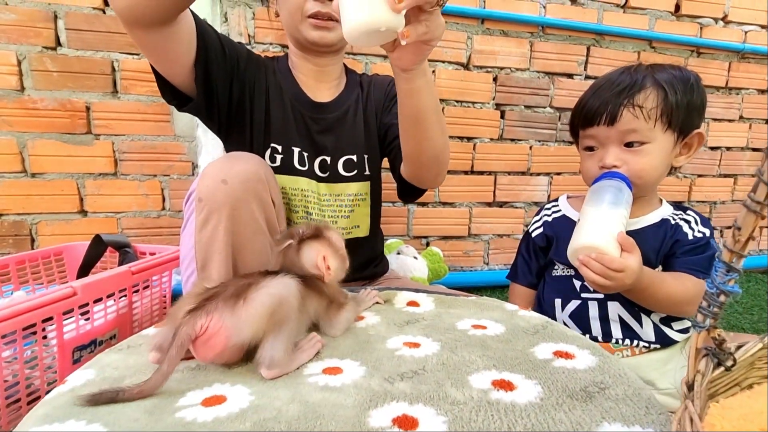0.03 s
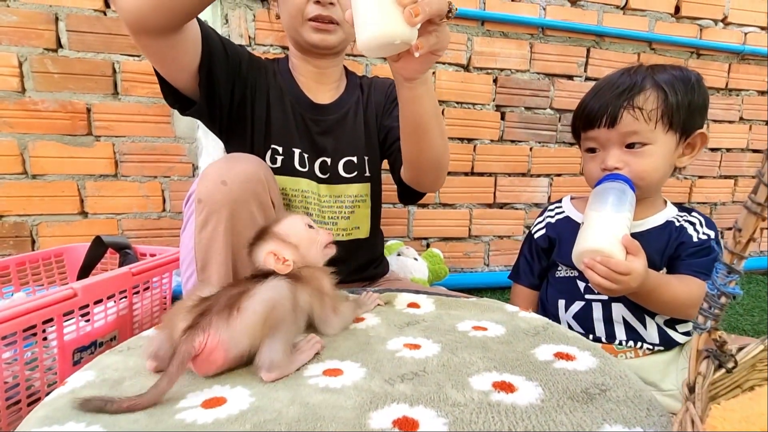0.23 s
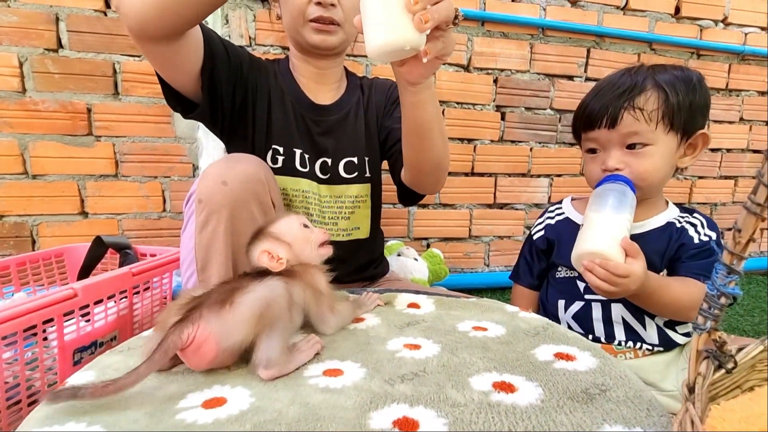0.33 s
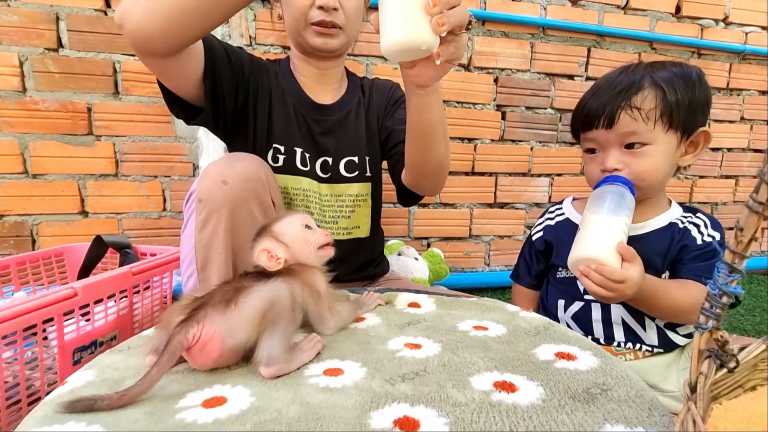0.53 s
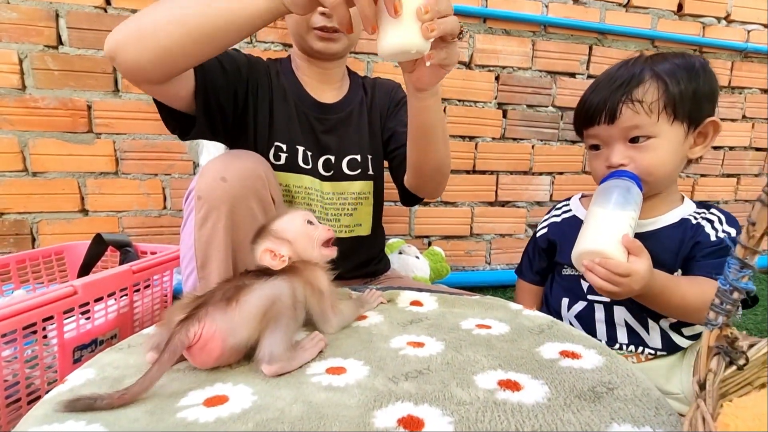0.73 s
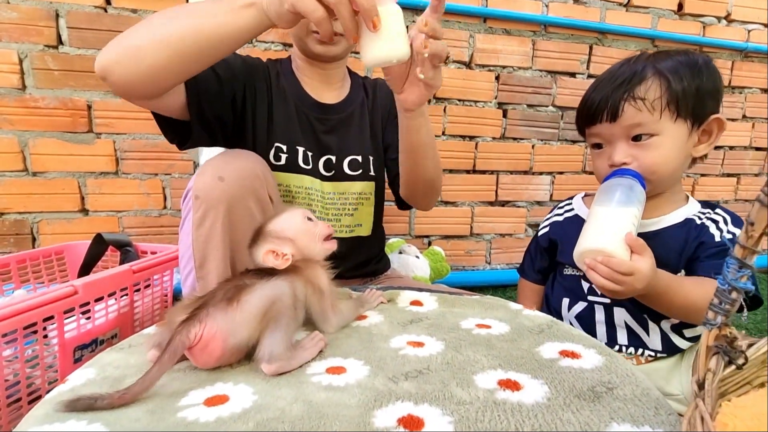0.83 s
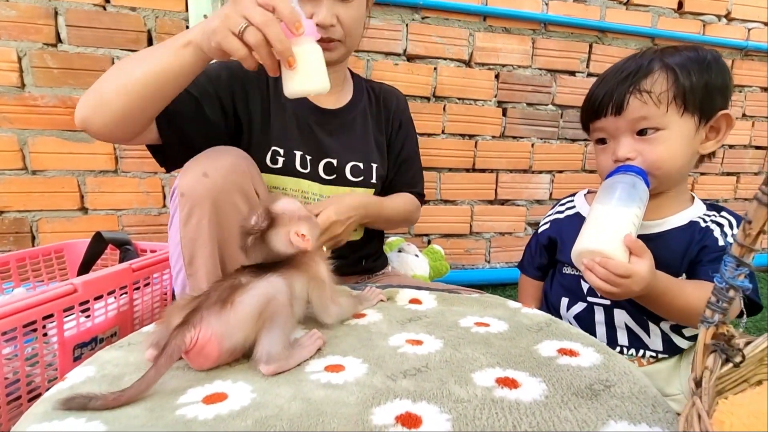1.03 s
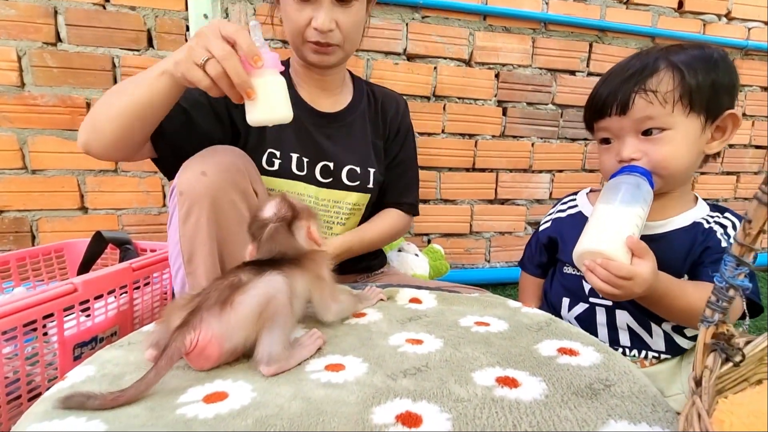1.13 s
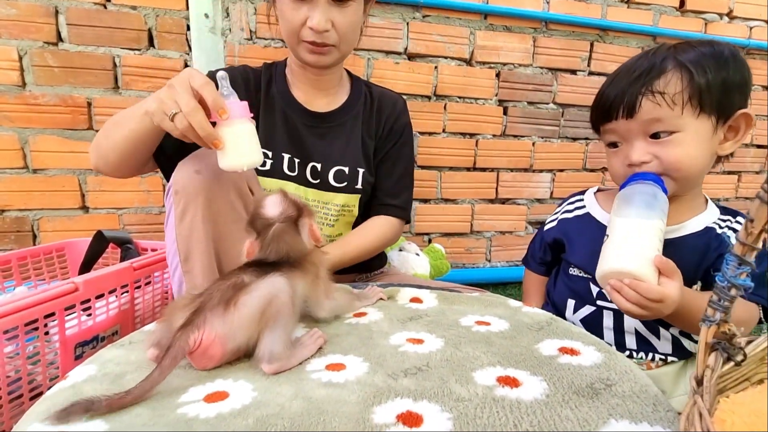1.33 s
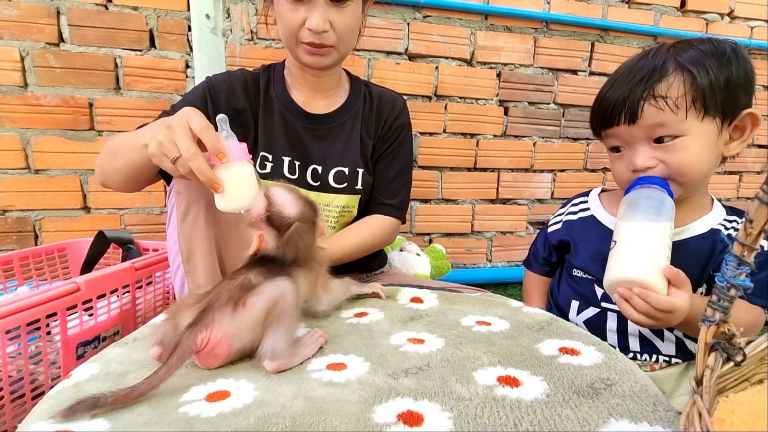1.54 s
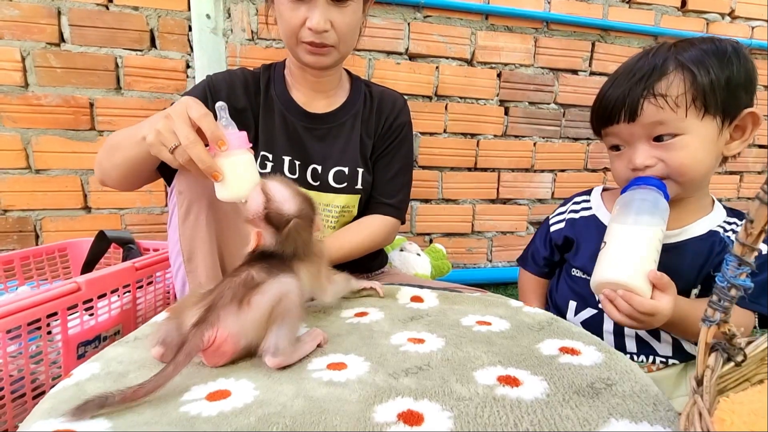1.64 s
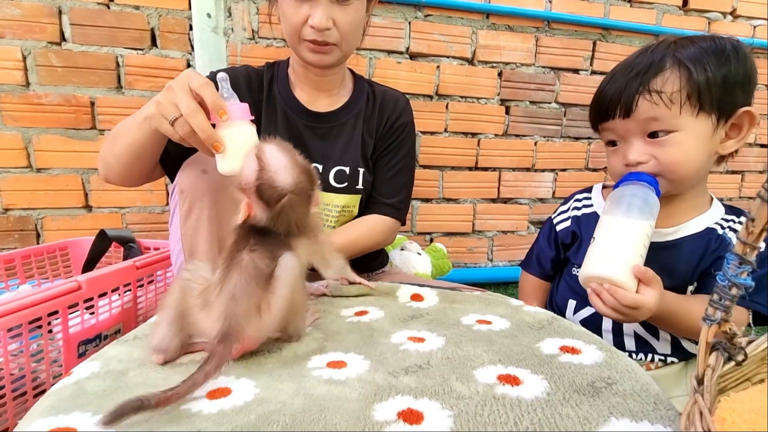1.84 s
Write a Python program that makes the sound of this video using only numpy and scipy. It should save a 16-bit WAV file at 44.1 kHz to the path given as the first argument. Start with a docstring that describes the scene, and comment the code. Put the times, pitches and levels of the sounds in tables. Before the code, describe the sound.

Five brief piercing cries from a hungry infant monkey, loudest at the third and fourth, sink into throaty grumbles with a short coo and final squeak, near the microphone, with hard wall echoes and faint low hum.

```python
"""A hungry baby monkey shrieks five times in a walled yard, each cry rising, then sliding down and roughening.
The last sinks into a grumble and a short coo; a second hoarse grumble ends in a squeak.
Voice: pulse-train folds and gated air noise through a throat filter, then two ports, left one leading.
Yard: discrete near echoes plus decaying noise; an earlier cry's ring is fading noise.
Background: coloured noise for rumble, hiss and blanket rustles; wavering sines for hum."""
import sys
import numpy as np
from scipy import signal
from scipy.fft import rfft, irfft
from scipy.io import wavfile
from scipy.ndimage import uniform_filter1d

SR = 44100
rng = np.random.default_rng(int(sys.argv[2]) if len(sys.argv) > 2 else 0)


def waveform_to_disk(signal):
    """Save audio, clipped to [-1, 1], as 16-bit WAV at the path in sys.argv[1]."""
    frames = np.transpose(np.atleast_2d(signal))
    scaled = np.clip(frames, -1, 1) * 32767
    samples = np.round(scaled).astype(np.int16)
    wavfile.write(sys.argv[1], SR, samples)


N = 83790
T = np.arange(N) / SR
HZ = np.fft.rfftfreq(2 * N, 1 / SR)
EDGE_HZ = 15850  # limit of the voice harmonics and of the recorder


def amp(db):
    """Decibels to gain."""
    return 10 ** (np.asarray(db) / 20)


def unit(x):
    """Scales to rms 1."""
    return x / np.sqrt(np.mean(x ** 2) + 1e-20)


def read(points, hz=HZ):
    """Interpolates a table linearly on a log-frequency axis."""
    f, value = np.transpose(points)
    return np.interp(np.log(hz + 1), np.log(f + 1), value)


def envelope(points):
    """Gain over time from a (time [s], level [dB]) table, linear in dB."""
    return amp(np.interp(T, *np.transpose(points)))


def colour(x, gain):
    """Filters by a gain for each frequency."""
    return irfft(rfft(x, 2 * N) * gain)[..., :N]


def wander(rate_hz):
    """Low-passed noise of rms 1."""
    return unit(colour(rng.standard_normal(N), np.exp(-(HZ / rate_hz) ** 2)))


# ring spectrum, relative: (frequency [Hz], level [dB])
RING_SPECTRUM = [(300, -29), (1100, -4.5), (1700, -16), (2300, -1.5), (3100, 0.5), (4400, -4), (5600, -5.5),
                 (7500, -27), (13000, -41), (16000, -40)]
RING_START_DB, RING_DECAY_DB_PER_S = -40.5, 269  # start level is before the port trim


def dying_ring():
    """The yard still rings from a cry just before: coloured noise decaying exponentially."""
    noise = unit(colour(rng.standard_normal((2, N)), amp(read(RING_SPECTRUM))))
    decay = amp(RING_START_DB - RING_DECAY_DB_PER_S * T)
    port_trim = amp([[-3], [2]])
    return noise * decay * port_trim


# air spectrum, relative density: (frequency [Hz], level [dB per Hz])
AIR_SPECTRUM = [(20, -14), (60, 2.5), (110, -3.5), (160, -11), (260, -16.5), (500, -24.5), (1000, -30.5),
                (2000, -31.5), (4200, -31.5), (7000, -39), (12000, -50.5), (16000, -53)]
# left-right likeness of the air: (frequency [Hz], correlation [-1..1])
AIR_LIKENESS = [(25, 0.37), (90, 0.94), (200, .8), (500, .5), (2000, .2), (10000, .1)]
AIR_DB = -51.5


def air():
    """Low rumble and faint hiss: coloured noise, partly shared by the two ports."""
    left, other = rng.standard_normal((2, N))
    same = np.clip(read(AIR_LIKENESS), -1, 1)
    right = colour(left, same) + colour(other, np.sqrt(1 - same ** 2))
    return amp(AIR_DB) * unit(colour(np.array([left, right]), amp(read(AIR_SPECTRUM))))


# hum lines before drift and overall level: (frequency [Hz], level [dB])
HUM_LINES = [(85.5, -56), (172, -61)]
# overall hum level: (time [s], level [dB])
HUM_LEVEL = [(0, -9), (.45, -2), (.9, 2), (1.5, 3.5), (1.9, 2.5)]
HUM_DRIFT, HUM_DRIFT_HZ = 0.016, 6  # rms fraction, rate
HUM_SWELL, HUM_SWELL_HZ = 0.46, 8


def hum():
    """Wavering hum, as of a distant motor: sines with common frequency drift and separate swells."""
    drift = 1 + HUM_DRIFT * wander(HUM_DRIFT_HZ)
    total = 0
    for hz, db in HUM_LINES:
        sine = np.sin(2 * np.pi * np.cumsum(hz * drift) / SR)
        swell = 1 + HUM_SWELL * wander(HUM_SWELL_HZ)
        total = total + amp(db) * unit(sine * swell)
    return total * envelope(HUM_LEVEL)


# colour of the clear voice, top harmonics weakened: (frequency [Hz], gain [dB])
CLEAR_COLOUR = [(300, 0), (5500, 0), (8500, -6), (11000, -10), (15000, -14)]
# colour of the rasp: (frequency [Hz], gain [dB])
RASP_COLOUR = [(300, -2.5), (900, -6), (1600, 4.5), (3000, 1.5), (6000, 3.5), (9000, 5), (12000, 5)]
JITTER, JITTER_HZ = .075, 306.3  # rms pitch fraction at full roughness, rate
WAVER, WAVER_HZ = 0.0086, 90  # rms pitch fraction at any roughness, rate
SHIMMER, SHIMMER_HZ = 1, 450  # rms amplitude fraction at full roughness, rate
PUFF_GATE = 0.23  # modulation depth of the air by the fold cycle


def folds(turn, mean_pitch_hz):
    """Vocal folds: band-limited pulse train, all harmonics up to the band edge."""
    count = np.floor(EDGE_HZ / mean_pitch_hz)
    pulses = np.sin((count + .5) * turn) / (2 * np.sin(turn / 2) + 1e-12) - .5
    return colour(unit(pulses), amp(read(CLEAR_COLOUR)))


def air_puffs(turn):
    """Rasp: turbulence noise gated once per fold cycle."""
    gated = (1 + PUFF_GATE * np.cos(turn)) * rng.standard_normal(N)
    return colour(unit(gated), amp(read(RASP_COLOUR)))


FIZZ_HZ, MOUTH_WIDTH_HZ = 7410, 275


def vocal_tract(throat, mouth, fizz_db):
    """Throat curve plus mouth resonances and fizz, as a minimum-phase response."""
    shape_db = read(throat) + fizz_db * np.clip(2 * (HZ / FIZZ_HZ - 1), 0, 1)
    for f, db in mouth:
        shape_db = shape_db + db / (1 + ((HZ - f) / MOUTH_WIDTH_HZ) ** 2)
    log_gain = np.log(amp(np.r_[shape_db, shape_db[-2:0:-1]]))
    return np.exp(signal.hilbert(log_gain).conj())[:N + 1]


SPLIT_HZ, SPLIT_SLOPE_HZ = 2050, 80
FADE_IN_S, FADE_OUT_S = 0.0069, .005


def call(curve, mouth, fizz_db, alternation, throat, low_rough):
    """Folds, steady or chaotic, mixed with puffs through the tract; low band less rough than treble."""
    times, *columns = np.transpose(curve)
    pitch_hz, rough, low_db, high_db = (np.interp(T, times, c) for c in columns)
    rough = np.clip(rough, 0, 1)
    hz = pitch_hz * (1 + JITTER * rough * wander(JITTER_HZ) + WAVER * wander(WAVER_HZ))
    turn = 2 * np.pi * np.cumsum(hz) / SR
    clear = folds(turn, pitch_hz.mean())
    # cos(turn / 2) makes alternate pulses strong and weak
    shake = SHIMMER * wander(SHIMMER_HZ) + 2 * alternation * np.cos(turn / 2)
    rasp = air_puffs(turn)
    tract = vocal_tract(throat, mouth, fizz_db)
    below = .5 - .5 * np.tanh((HZ - SPLIT_HZ) / SPLIT_SLOPE_HZ)
    out = 0
    for part, r, db in ((below, rough * low_rough, low_db), (1 - below, rough, high_db)):
        voice = (1 - r) * clear * (1 + r * shake) + r * rasp
        band = colour(voice, tract * part)
        # level each band over about 7 ms, then apply its curve
        local_rms = np.sqrt(abs(uniform_filter1d(band ** 2, size=300)) + 1e-12)
        out = out + amp(db) * band / local_rms
    fade_in = np.clip((T - times[0]) / FADE_IN_S, 0, 1)
    fade_out = np.clip((times[-1] - T) / FADE_OUT_S + 1, 0, 1)
    return out * fade_in * fade_out


# shriek curves, levels before the direct and echo gains:
# (time [s], pitch [Hz], roughness [0-1], level below split [dB], level above split [dB])
SHRIEK_1 = [(0.232, 1154, 0.58, -33.5, -52.5), (0.236, 1223, 0.48, -28, -32.5),
            (0.243, 1233, 0.22, -21.5, -27.5), (0.249, 1189, 0.24, -40.5, -24.5),
            (0.256, 991, 0.48, -32, -28.5), (0.264, 774, 0.65, -30.5, -36), (0.274, 710, 0.83, -41, -44.5),
            (0.288, 593, 1, -59, -45.5)]
SHRIEK_2 = [(0.429, 1107, 0.7, -60, -35), (0.435, 1200, 0.54, -21, -21.5), (0.443, 1251, 0.59, -31, -30.5),
            (0.451, 1113, 0.53, -22.5, -17), (0.46, 1023, 0.29, -33, -36), (0.476, 873, 0.57, -35, -31.5),
            (0.492, 726, 0.5, -53, -47.5)]
SHRIEK_3 = [(0.642, 1493, 0.52, -43, -25.5), (0.649, 1685, 0.14, -13, -13), (0.655, 1448, 0.078, -23, -13),
            (0.664, 1317, 0.52, -32, -13.5), (0.677, 1122, 0.15, -26.5, -14.5),
            (0.682, 1048, 0.3, -32.5, -18.5), (0.688, 1000, 0.46, -28.5, -19.5),
            (0.703, 836, 0.29, -47, -28.5), (0.716, 794, 0.27, -58, -33)]
SHRIEK_4 = [(0.861, 1650, 0.4, -28, -30), (0.865, 1756, 0.2, -30, -15.5), (0.87, 1866, 0.12, -55, -20),
            (0.875, 1857, 0.2, -43, -11.5), (0.881, 1580, 0.08, -17, -10), (0.89, 1457, 0.06, -30.5, -10),
            (0.9, 1391, 0.15, -31, -20), (0.908, 1103, 0.45, -30.5, -18), (0.92, 963, 0.65, -32, -27),
            (0.934, 803, 0.8, -82, -32.5)]
SHRIEK_5 = [(1.095, 850, 0.26, -43.5, -42), (1.105, 1087, 0.08, -34.5, -28), (1.117, 1172, 0.049, -29, -26),
            (1.125, 1114, 0.082, -31, -27), (1.132, 953, 0.21, -39, -22), (1.141, 791, 0.53, -29, -24.5),
            (1.147, 733, 0.6, -38.5, -33), (1.162, 769, 1, -38, -39), (1.178, 710, 0.61, -49, -43.5)]
# shriek settings: (curve, mouth resonances [(frequency [Hz], lift [dB])], fizz [dB], pulse alternation [0-1])
SHRIEKS = [(SHRIEK_1, [(2380, 15.5), (3650, 12.5), (6500, 14)], 11, .1), (SHRIEK_2, [(3300, 6),
           (1210, -4.5), (6100, 3.5)], 5.1, .1), (SHRIEK_3, [(4150, 8), (1934, -11), (6600, 10)], 9, 0.11),
           (SHRIEK_4, [(4370, 6), (2360, -8.5), (6440, -7)], 3.5, 0.072), (SHRIEK_5, [(4460, 9),
           (2980, -16.5), (3430, 14.5)], 8.5, 0.049)]
# throat with the mouth wide open: (frequency [Hz], gain [dB])
OPEN_THROAT = [(150, -44.5), (350, -12), (550, -3.5), (1100, -5), (1700, -3), (2000, -3.5), (2450, -5),
               (2900, -5.5), (3450, -4.5), (4400, 2), (5700, -6.5), (6600, -13), (7400, -19.5),
               (8900, -17.5), (10800, -39), (12800, -22), (15800, -43.5)]


def shriek_calls():
    """Five cries with the mouth wide open, roughness reduced below the split."""
    return sum(call(*row, OPEN_THROAT, low_rough=.56) for row in SHRIEKS)


# port balance: (frequency [Hz], left minus right [dB])
BALANCE_DB = [(200, 18.5), (450, 5.5), (800, 4.5), (1200, 5), (1800, 1.5), (2700, -7.5), (3500, -2.5),
              (4400, -11.5), (5100, -9), (6400, -5.5), (9500, 1), (12700, -5), (15000, -7)]
# phase lead of the left port: (frequency [Hz], lead [rad])
LEAD_RAD = [(50, 10.5), (500, 0.02), (1100, 1.43), (1900, 3.5), (3000, 4.5), (4300, 3), (5000, 4.5),
            (7000, 8.5), (9000, 11), (12500, 14), (16000, 16.5)]


def microphones(x, lag_s):
    """Two ports of different colour, the left leading in phase; lag_s adds lead, in full from 3 kHz."""
    sides = np.array([[.5], [-.5]])
    tilt = amp(read(BALANCE_DB) * sides)
    tilt = tilt / np.sqrt((tilt ** 2).mean(0))
    lead_rad = read(LEAD_RAD) + 2 * np.pi * HZ * lag_s * np.clip(HZ / 3000, 0, 1)
    return colour(x, tilt * np.exp(1j * lead_rad * sides))


# tail decay: (frequency [Hz], t60 [s])
YARD_T60_S = [(200, 0.84), (1000, 0.15), (2400, 0.22), (4500, 0.43), (7000, 0.11), (14000, 0.22)]
# tail spectrum before tail_db and port trim: (frequency [Hz], level [dB])
YARD_DB = [(200, -5.5), (1000, -18), (1900, -20), (2400, -8), (3200, -14.5), (4500, -29), (6000, -12.5),
           (7500, -9.5), (10000, -13.5), (14000, -22)]
# near echoes before scatter and echo_db: (delay [s], gain [dB])
ECHOES = [(.0031, -16), (.0058, -17.5), (.0094, -12.5), (0.013, -34), (0.022, -31.5)]


def yard(x, echo_db, tail_db):
    """Near echoes from table and wall, plus a diffuse tail with frequency-dependent decay."""
    hz, t, z = signal.stft(rng.standard_normal((2, N)), SR, nperseg=256)
    t60_s = read(YARD_T60_S, hz)[:, None]
    decay = 1e-3 ** (t / t60_s)
    equal_energy = np.sqrt(np.log(1e6) / t60_s / SR)
    tail = signal.istft(z * decay * equal_energy, SR, nperseg=256)[1][:, :N]
    onset = np.minimum(T / 0.002, 1)
    response = colour(tail * onset, amp(read(YARD_DB) + tail_db)) * amp([[-1.5], [1.5]])
    for delay_s, db in ECHOES:
        # each port's delay is scattered by up to 15 %
        index = (delay_s * SR * rng.uniform(.85, 1.15, 2)).astype(int)
        response[[0, 1], index] += amp(db + echo_db)
    return signal.fftconvolve(x[None], response, axes=1)[:, :N]


# rustle level: (time [s], level [dB])
SHUFFLE_LEVEL = [(.57, -85), (.605, -58.5), (.66, -51), (.7, -78.5), (1.4, -73), (1.5, -63), (1.58, -61.5),
                 (1.66, -84)]
SHUFFLE_HZ, SHUFFLE_WIDTH_HZ = 4140, 510


def shuffle():
    """Faint rustles as the monkey shifts on the blanket: resonance-shaped noise."""
    resonance = 1 / (1 + ((HZ - SHUFFLE_HZ) / SHUFFLE_WIDTH_HZ) ** 2)
    hiss = unit(colour(rng.standard_normal((2, N)), resonance))
    return hiss * envelope(SHUFFLE_LEVEL)


# whimper curves, levels before flutter and the direct and echo gains:
# (time [s], pitch [Hz], roughness [0-1], level below split [dB], level above split [dB])
GRUMBLE_1 = [(1.165, 370, 0.46, -36, -66), (1.19, 333.5, 0.47, -41.5, -49.5),
             (1.215, 385.4, 0.54, -34.5, -49.5), (1.232, 288.2, 0.32, -39.5, -54.5),
             (1.268, 304.3, 0.31, -36.5, -48.5), (1.293, 354.5, 0.79, -32, -49),
             (1.312, 321, 0.37, -40.5, -47.5), (1.335, 336.4, 0.5, -34, -54)]
COO = [(1.322, 659, 0.32, -38.5, -47.5), (1.343, 770.4, 0.1, -26, -40), (1.352, 754, 0.1, -33.5, -41.5),
       (1.362, 682, 0.06, -29, -42), (1.385, 665.6, 0.031, -35, -47), (1.396, 647, 0.08, -48, -58),
       (1.403, 640, 0.2, -68, -62)]
GRUMBLE_2 = [(1.553, 498.7, 0.37, -52, -57), (1.563, 514, 0.24, -40, -71), (1.58, 393.3, 0.3, -42, -58.5),
             (1.602, 358.6, 0.2, -37.5, -61.5), (1.63, 381.8, 0.27, -41.5, -55),
             (1.657, 385.5, 0.22, -34.5, -52), (1.685, 333.9, 0.48, -37.5, -38.5),
             (1.706, 394.6, 0.82, -32.5, -46), (1.728, 360.7, 0.71, -36, -49.5),
             (1.757, 340.2, 0.15, -38.5, -44), (1.777, 407.3, 0.65, -33.5, -39),
             (1.787, 421, 0.6, -64, -64)]
SQUEAK = [(1.763, 730.4, 0.32, -46, -58.5), (1.773, 778, 0.12, -34, -52), (1.779, 807, .15, -24.5, -48),
          (1.785, 790, .3, -55, -62)]
# whimper settings: (curve, mouth resonances [(frequency [Hz], lift [dB])], fizz [dB], pulse alternation [0-1])
WHIMPERS = [(GRUMBLE_1, [(1350, 3), (2900, 1.2)], 0, 0.4), (COO, [(720, -4), (2950, -10)], 9, 0.069),
            (GRUMBLE_2, [(2793, 9.5), (2200, -5.5), (1196, -3.5), (1644, 2)], 0.81, 0.17),
            (SQUEAK, [(1580, 2), (3000, 5)], 0, 0.17)]
# throat with the mouth nearly shut: (frequency [Hz], gain [dB])
SHUT_THROAT = [(150, -35), (370, -10.5), (550, 1), (750, 3.5), (950, -3.5), (1400, 5.5), (1700, -5),
               (1950, -21), (2400, -19), (2850, -14), (3650, -20), (4500, -15), (5500, -39), (7700, -42.5),
               (9500, -34), (12000, -37), (14500, -50), (15800, -46)]
FLUTTER, FLUTTER_HZ = 0.25, 60.5  # rms amplitude fraction, rate


def whimper_calls():
    """Grumbles, coo and squeak with the mouth nearly shut, amplitude fluttering at random."""
    calls = sum(call(*row, SHUT_THROAT, low_rough=.8) for row in WHIMPERS)
    return calls * (1 + FLUTTER * wander(FLUTTER_HZ))


WALL_LAG_S = 0.00021  # extra lead of the left port once the head is turned


def scene():
    """Shrieks in the open, then whimpers turned away, with stronger wall echoes; ring and background below."""
    shrieks = shriek_calls()
    whimpers = whimper_calls()
    direct = microphones(amp(.8) * shrieks, 0)
    direct = direct + microphones(amp(-0.36) * whimpers, WALL_LAG_S)
    reflected = yard(shrieks, echo_db=-1.0, tail_db=1.5)
    reflected = reflected + yard(whimpers, echo_db=1.0, tail_db=-0.5)
    return direct + reflected + dying_ring() + shuffle() + air() + hum()


KNEE, CEILING = .82, .98  # full scale = 1


def record(dry):
    """Peaks beyond the knee are rounded off by tanh, then the recorder's band limit."""
    within = np.clip(dry, -KNEE, KNEE)
    room = CEILING - KNEE
    soft = within + room * np.tanh((dry - within) / room)
    low_pass = signal.firwin(511, EDGE_HZ, window=("kaiser", 9), fs=SR)
    return signal.oaconvolve(soft, low_pass[None], "same")


dry = scene()
out = record(dry)
waveform_to_disk(out)
```